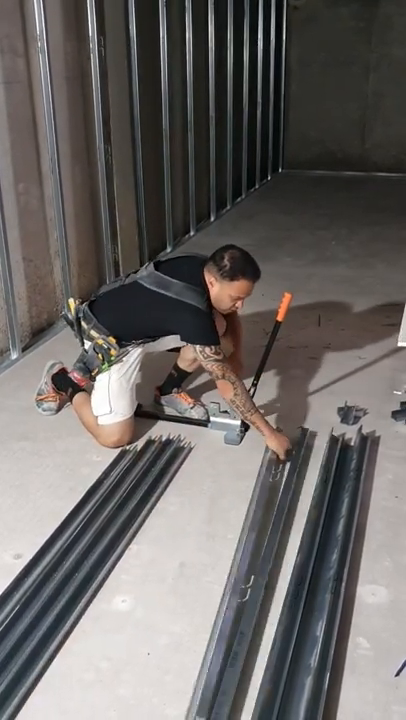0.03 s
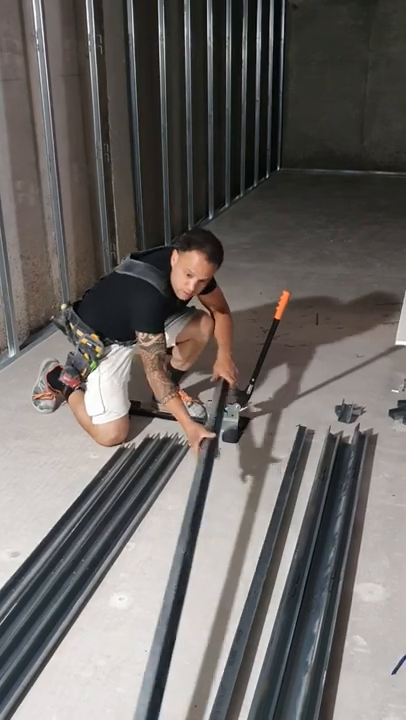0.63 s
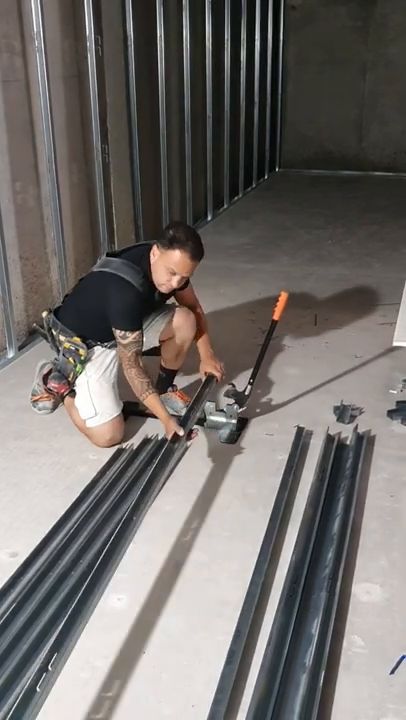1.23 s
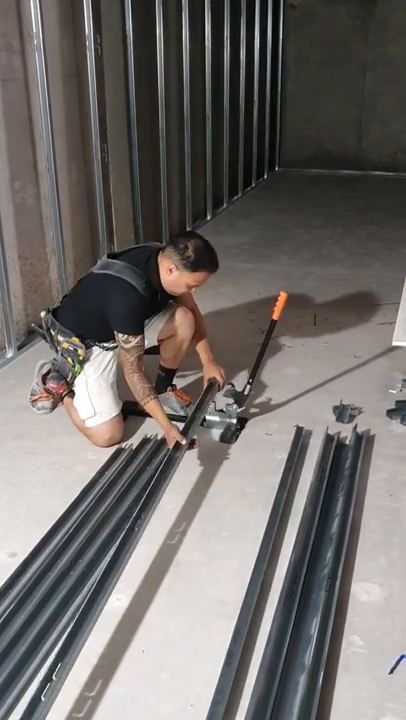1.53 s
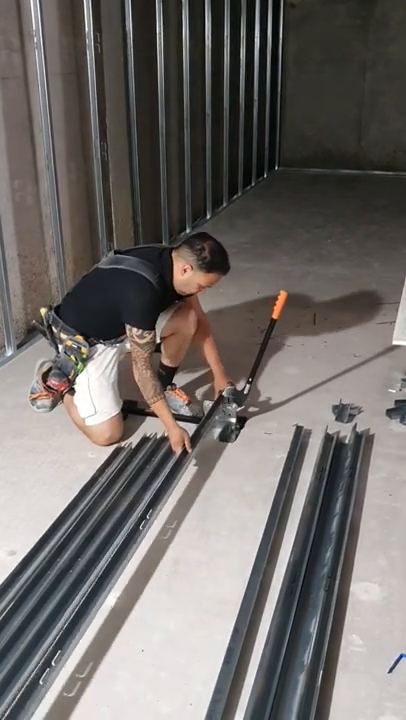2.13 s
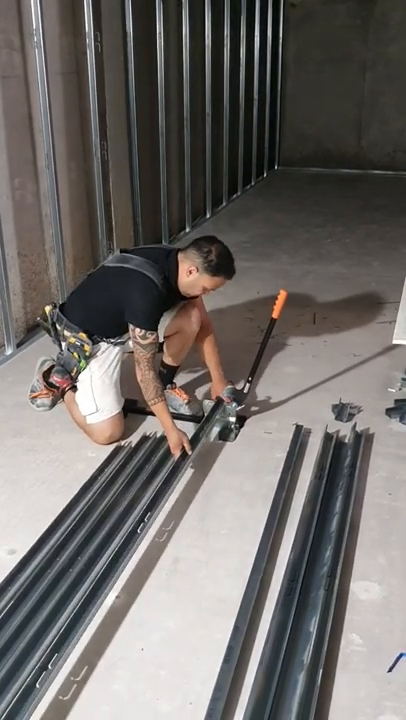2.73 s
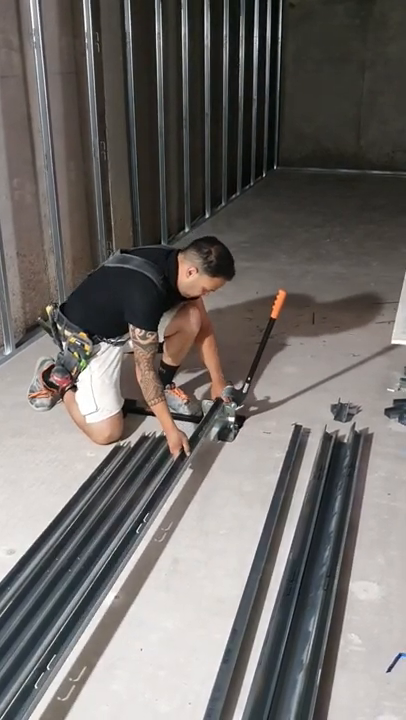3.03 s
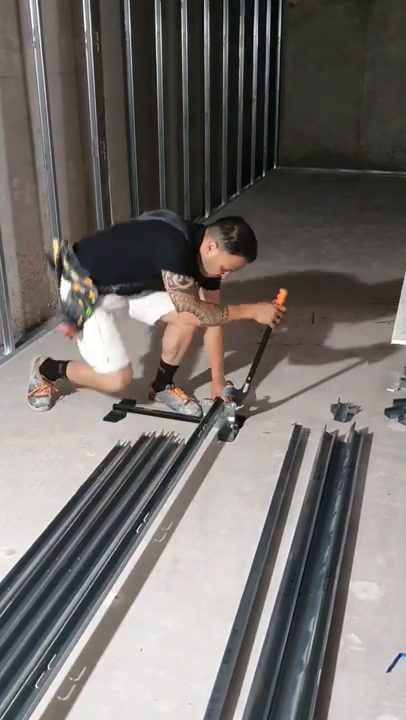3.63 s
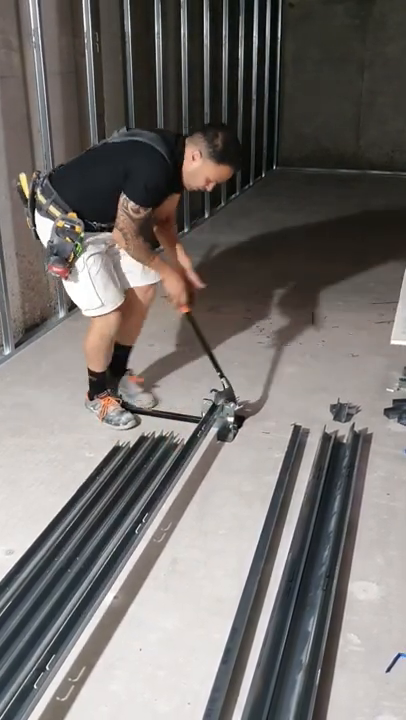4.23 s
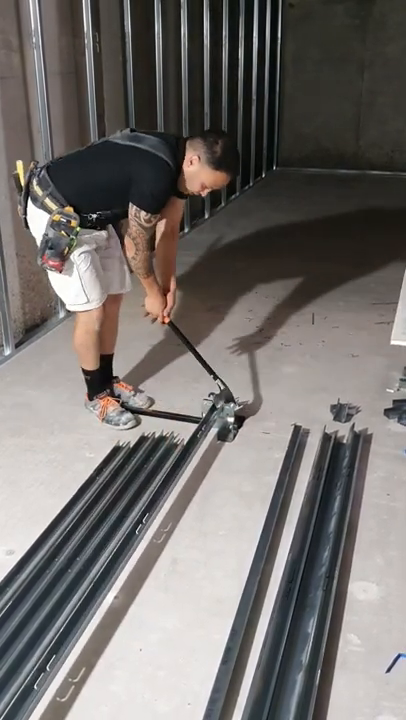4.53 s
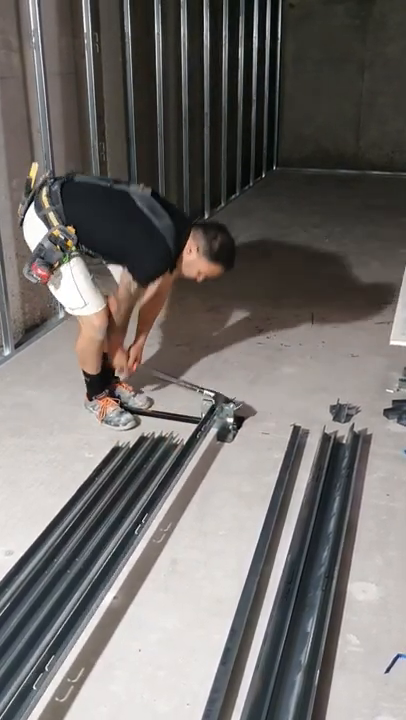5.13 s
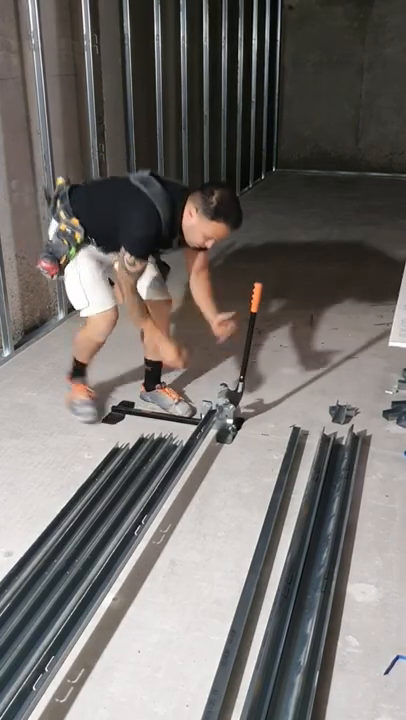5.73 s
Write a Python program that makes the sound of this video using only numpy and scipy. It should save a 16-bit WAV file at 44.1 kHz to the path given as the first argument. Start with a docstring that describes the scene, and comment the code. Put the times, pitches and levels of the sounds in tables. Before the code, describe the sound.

A long, thin steel profile is dragged off a pile with sharp, ringing knocks and scrapes, then clatters again as it slides into a lever cutter. After some quiet shoe scuffs come thumps and a loud clank. The blade shears the steel in a quick cluster of snaps and squeals briefly on its return. The bare concrete room echoes, and the sound is louder and harder on the right.

```python
"""In a bare concrete room, a long thin steel profile is dragged off a pile and sheared in a lever cutter.
Every knock sets the loose metal chattering and ringing. Sliding steel catches and slips, shoes scuff
and stamp, and the blade rubs, snaps the steel and squeals. A low hum swells and fades.
The right microphone port (its opening) resonates near 2 kHz, so that side is louder and harder."""
import sys
import numpy as np
from scipy import signal
from scipy.fft import irfft
from scipy.io import wavfile
from scipy.ndimage import uniform_filter1d, minimum_filter1d

SR = 44100
rng = np.random.default_rng(int(sys.argv[2]) if len(sys.argv) > 2 else 0)


def log_audio(samples):
    """Write samples as a 16-bit WAV file to the path given in sys.argv[1]."""
    # one column per channel
    frames = np.atleast_2d(samples).T
    # limit to full scale, then quantise
    limited = np.clip(frames, -1, 1)
    pcm = np.round(limited * 32767).astype(np.int16)
    wavfile.write(sys.argv[1], SR, pcm)


N = 264159
HZ = np.fft.rfftfreq(2048, 1 / SR)  # the frequencies at which filter gains are set


def amp(db):
    """Turns decibels into a gain."""
    return 10 ** (np.asarray(db) / 20)


def unit(x):
    """Scales a sound to an energy of one."""
    return x / np.sqrt(np.sum(x ** 2, axis=-1, keepdims=True) + 1e-20)


def read(points, hz):
    """Reads between the rows of a table, on a log-frequency axis."""
    f, value = np.transpose(points)
    return np.interp(np.log(hz + 1), np.log(f), value)


def around(hz, note_hz, octaves=0.15):
    """A bell curve of height one around a note."""
    return np.exp(-.5 * (np.log2((hz + 1) / note_hz) / octaves) ** 2)


def add(mix, s, sound):
    """Adds a sound to the mix at s seconds."""
    part = mix[..., max(round(s * SR), 0):][..., :sound.shape[-1]]
    part += sound[..., :part.shape[-1]]


def tone_filter(db):
    """The quickest impulse response that has these gains at the frequencies HZ."""
    log_gain = np.log(amp(np.r_[db, db[-2:0:-1]]))
    spectrum = np.exp(np.conj(signal.hilbert(log_gain)))
    return irfft(spectrum[:len(HZ)])


def contacts(samples, per_s, spread_db):
    """A random train of tiny taps of uneven size."""
    chance, size, sign = rng.random((3, samples))
    return (chance < per_s / SR) * amp(spread_db * size) * np.sign(sign - .5)


def steel(force, treble_db, bass_db, extra_db=0, treble_hz=3400, bass_hz=1100):
    """Thin steel turns a force into sound: hard contacts are brighter, heavy ones fuller."""
    # the tone of thin steel: f/Hz, level/dB
    spectrum = [(60, -36), (170, -27), (350, -18.5), (520, -15), (750, -3.5), (1100, 1.5), (1450, -2.5),
                (1950, 5.5), (2600, -3), (3600, -9), (5000, -10.5), (7000, -13.5), (9500, -24),
                (12500, -23.5)]
    plain = read(spectrum, HZ)
    treble = treble_db / (1 + (treble_hz / (HZ + 1)) ** 4)
    bass = bass_db / (1 + (HZ / bass_hz) ** 4)
    response = tone_filter(plain + treble + bass + extra_db)
    return signal.fftconvolve(force, response) / np.linalg.norm(tone_filter(plain))


def knock(s, db, treble_db, bass_db, decay_s, note_hz, note_db, impact_db=5.5, chatter_db=-0.5):
    """A blunt hit, then the loose steel chatters. Gives (start time, close-sound gain in dB, sound)."""
    t = np.arange(SR // 4) / SR
    share = 1 - np.exp(-decay_s / 0.0079)  # longer chatter takes more of the energy
    taps = contacts(len(t), per_s=1200, spread_db=12.5)
    chatter = unit(taps * np.exp(-t / decay_s) * (1 - np.exp(-t / 0.00066)))
    impact = np.exp(-2 * np.pi * 2600 * t)  # dull above 2600 Hz
    force = np.sqrt(share) * chatter + np.sqrt(1 - share) * impact / impact.sum()
    # the hit faces the microphone, while chatter spreads along the profile
    close_db = impact_db + (chatter_db - impact_db) * share
    return s, close_db, amp(db) * steel(force, treble_db, bass_db, note_db * around(HZ, note_hz))


def ringing(hits, modes, level_db, swell_s=0.02):
    """Each hit leaves the steel's own notes (modes) ringing, coloured by that hit's tone."""
    out = np.zeros((2, N))
    s, db, treble_db, bass_db, _, note_hz, note_db = np.transpose(hits)
    starts = np.round(s * SR).astype(int)
    swell = np.exp(-1 / (swell_s * SR))  # the ring takes a moment to fill the room
    for hz, mode_db, fade_s in modes:
        colour_db = treble_db * min(hz / 7000, 1) + bass_db * (hz < 1100) + note_db * around(hz, note_hz)
        kicks = np.zeros(N, complex)
        kicks[starts] = amp(db + colour_db) * np.exp(2j * np.pi * rng.random(len(starts)))
        fade = amp(-60 / fade_s / SR)
        turn = np.exp(2j * np.pi * hz / SR)
        feedback = np.poly([fade * turn, swell * turn])
        left = signal.lfilter([1 - swell], feedback, kicks) * 2 * np.sqrt(1 - fade)
        right = left * np.exp(2j * np.pi * rng.random())
        out += amp(mode_db + level_db) * np.array([left.real, right.real])
    return out


def profile_knocks():
    """The profile hits the pile, floor or cutter; where it is struck decides which note stands out."""
    # knocks: t/s, level/dB, treble/dB, bass/dB, chatter decay/s, note/Hz, note boost/dB
    hits = [ (0.001, 4.5, 6, 7.5, 0.013, 970, 0), (0.038, 13, 8.5, 4, 0.018, 568, 10.5),
            (0.105, 5, 8.5, 7, .005, 775, 12.5), (0.121, 11, 2.5, -11, 0.006, 1850, -1.5),
            (0.418, 7.5, -1, -8.5, 0.02, 3490, 6.5), (1.426, 10, -2.5, -1, 0.024, 820, -1),
            (1.438, 9.5, -1.5, 4.5, 0.063, 389, 8), (1.857, -2.5, -2, -13, 0.015, 12500, 5),
            (1.878, 10, -1.5, -3.5, 0.0092, 863, 14), (2.050, 9, -24, -0.5, .004, 1040, 6.5),
            (2.177, 7.5, -5.5, -8, 0.024, 11900, 5), (2.347, 5, -4, 2, 0.011, 12100, 6.5),
            (2.62, -11, -6.5, 17.5, 0.016, 700, -18), (2.969, -27.5, -3.5, -14, 0.0044, 2200, 4.5),
            (3.185, -6.5, 1, -10.5, 0.012, 3520, 5), (3.607, -23, 6.5, 12.5, 0.028, 12300, 5),
            (3.844, -16, -9.5, 8.5, 0.0094, 1110, -3), (3.893, -20.5, -7, 20, 0.0088, 1013, 8.5),
            (4.007, 0.5, -15.5, 10, 0.01, 1340, -0.5), (4.326, 12.5, -2.5, -1.5, 0.0038, 1020, 1),
            (4.725, 3, 15.5, 1.5, .005, 12400, 12)]
    # the notes of the whole profile: f/Hz, relative level/dB, time to fade by 60 dB/s
    modes = [(172, -47, 1.6), (393, -32, 1.7), (604, -27, 1.2), (730, -25, 1.3), (816, -24, 1.2),
             (961, -27, 1.2), (1135, -28, 1.3), (1248, -30, 1.1), (1500, -29, 1.1), (1825, -27, 1.1),
             (1888, -26, 1.2), (2195, -29, .9), (2993, -32, 1.1), (3310, -37, 1.25), (3553, -32, 1),
             (3693, -33, .9), (4986, -36, .9)]
    return [knock(*hit) for hit in hits], ringing(hits, modes, level_db=2)


def hum_and_air(hum_hz=48.2, rumble_db=-16, air_db=-81):
    """A low hum with a little rumble swells and fades, over very quiet air."""
    # the rise and fall of the hum: t/s, level/dB
    swells = [(0.0, -68), (0.32, -85.5), (0.8, -70), (1.25, -77.5), (1.8, -58), (2.17, -70), (2.22, -63),
              (2.47, -92), (2.85, -59.5), (4.12, -47), (4.59, -60.5), (4.84, -83), (4.87, -67.5),
              (5.17, -89), (5.91, -78), (5.99, -84.5)]
    # the tone of the air: f/Hz, relative level/dB
    air_spectrum = [(30, -1), (100, -0.5), (400, -7), (2000, -11.5), (4000, -32.5), (7000, -33.5),
                    (10000, -51.5)]
    t = np.arange(N) / SR
    low_band = signal.butter(2, [45, 90], "band", fs=SR, output="sos")
    rumble = signal.sosfilt(low_band, rng.standard_normal(N))
    tone = np.sqrt(2) * np.sin(2 * np.pi * hum_hz * t)
    level = amp(np.interp(t, *np.transpose(swells)))
    hum = level * (tone + amp(rumble_db) * rumble / rumble.std())
    air_filter = unit(tone_filter(read(air_spectrum, HZ)))
    air = signal.oaconvolve(rng.standard_normal((2, N)), air_filter[None], axes=1)[:, :N]
    return hum + amp(air_db) * air


def scrape(length_s, db, treble_db, bass_db=0, slips_per_s=1500, uneven_db=12.5):
    """An edge catches and slips many times during one stroke that swells and fades."""
    t = np.arange(SR // 2) / SR
    stroke = np.sin(np.pi * np.minimum(t / length_s, 1))
    force = unit(contacts(len(t), slips_per_s, uneven_db) * stroke)
    return amp(db) * steel(force, treble_db, bass_db)


def profile_slides():
    """The profile slides over the pile and through the cutter; pressed harder, it sounds duller."""
    # slides: t/s, length/s, level/dB
    slides = [(0.043, 0.23, 7.5), (0.253, 0.32, 0), (0.662, 0.12, -18.5), (0.95, 0.2, -35),
              (1.599, 0.27, 2), (1.98, 0.3, 5.5), (2.163, .13, -0.5), (2.619, 0.2, -31),
              (2.927, 0.058, -30), (3.001, 0.45, -21.5), (3.88, 0.32, -7), (4.455, 0.41, -8.5),
              (5.677, 0.36, -44.5)]
    return [(s, scrape(length, db, treble_db=-6 - 0.375 * db)) for s, length, db in slides]


def floor_thumps(decay_s=0.0074, soft_hz=1600, close_db=7):
    """Shoes and the cutter's base give the concrete short, soft pushes."""
    # thumps: t/s, level/dB
    thumps = [(2.349, -15.5), (3.997, -3.5), (4.308, -4), (5.636, -34), (5.932, -33.5)]
    # the tone of a thump on concrete: f/Hz, relative level/dB
    spectrum = [(30, -35), (80, -13.5), (140, -17.5), (260, -7), (420, -3), (700, -8), (1500, -14.5)]
    t = np.arange(SR // 10) / SR
    floor = tone_filter(read(spectrum, HZ))
    events = []
    for s, db in thumps:
        burst = rng.standard_normal(len(t)) * np.exp(-t / decay_s)
        push = signal.lfilter(*signal.butter(2, soft_hz, fs=SR), burst)
        events.append((s, close_db, amp(db) * unit(signal.fftconvolve(push, floor))))
    return events


def shoe_scuffs():
    """Shoes catch and slip on the concrete."""
    # scuffs: t/s, length/s, level/dB
    scuffs = [(2.64, .2, -28.5), (3.17, 0.38, -22.5), (3.619, .35, -22), (4.135, 0.069, -20)]
    return [(s, scrape(length, db, treble_db=9.5, bass_db=15.5)) for s, length, db in scuffs]


def blade_strokes():
    """The blade shears down through the steel and rubs back up."""
    # strokes: t/s, length/s, level/dB, treble/dB
    strokes = [(4.736, 0.087, 8, 10.5), (4.911, 0.14, 3, 5), (5.05, 0.2, 4, -1), (5.222, 0.2, -4.5, 3.5)]
    return [(s, scrape(length, db, treble_db, bass_db=-10, slips_per_s=800, uneven_db=11))
            for s, length, db, treble_db in strokes]


def steel_snaps(bass_db=-6.5, chatter_s=0.0042, note_db=6):
    """The steel snaps under the blade and springs free, and the short cut piece rings."""
    # snaps: t/s, level/dB, treble/dB, note/Hz
    snaps = [(4.865, 3, -4.5, 2080), (4.890, 1, 1, 2050), (4.917, 10.5, 1.5, 980), (4.927, 5.5, 1, 4090),
             (4.947, 3.5, 1.5, 4960), (4.984, 2, -20, 1990), (5.02, 2, -6.5, 3670), (5.224, -5, -17, 1870)]
    # the notes of the cut piece: f/Hz, relative level/dB, time to fade by 60 dB/s
    modes = [(1135, -25, 1.1), (1319, -28, 1.1), (1888, -22, 1.2), (1955, -23, 1.1), (2396, -29, 1.1),
             (2977, -30, 1), (3650, -24, .9), (4086, -26, .9), (4856, -26, .8), (4972, -24, .8),
             (4988, -20, .85), (5953, -31, .85), (6285, -29, .85), (7300, -31, .8)]
    hits = [(s, db, treble_db, bass_db, chatter_s, hz, note_db) for s, db, treble_db, hz in snaps]
    return [knock(*hit, impact_db=9.5) for hit in hits], ringing(hits, modes, level_db=3.5)


def blade_squeal(start_s=5.11, length_s=0.15, db=-6, note_hz=5040, width_hz=130):
    """The returning blade makes the cut edge squeal briefly."""
    rub = scrape(length_s, db=0, treble_db=0)
    squeal = signal.lfilter(*signal.iirpeak(note_hz, note_hz / width_hz, fs=SR), rub)
    return start_s, amp(db) * unit(squeal)


def close_sound(x, straight_db=-9, echo_db=-6, decay_s=0.0098):
    """Sound reaches each port straight, then as quick echoes off the floor and the wall studs."""
    t = np.arange(SR // 12) / SR
    echoes = np.array([contacts(len(t), per_s=1000, spread_db=20) for _ in range(2)])
    response = amp(echo_db) * unit(echoes * np.exp(-t / decay_s))
    right_delay = rng.integers(12)  # samples
    response[0, 0] += amp(straight_db)
    response[1, right_delay] += amp(straight_db)
    return signal.fftconvolve(x[None], response, axes=1)


def room(x, tail_db=-2, build_s=0.0042):
    """Bare concrete gives a long, dense echo whose treble dies first."""
    # how long the room rings: f/Hz, time to fade by 60 dB/s
    fade_times = [(100, 1.8), (400, 1.5), (1000, 1.155), (2000, 0.73), (4000, 0.69), (7000, 0.6),
                  (12500, 0.35)]
    t = np.arange(3 * SR // 2) / SR
    hz, when, bands = signal.stft(rng.standard_normal((2, len(t))), SR, nperseg=256)
    fade = amp(-60 * when / read(fade_times, hz)[:, None])
    tail = signal.istft(bands * fade, SR, nperseg=256)[1][:, :len(t)]
    response = amp(tail_db) * unit(tail * (1 - np.exp(-t / build_s)))
    return signal.fftconvolve(x[None], response, axes=1)[:, :N]


def scene(spot_count=5):
    """The sounds are dealt out in turn to several spots, each with its own path through the room."""
    thumps = floor_thumps()
    knocks, profile_ring = profile_knocks()
    snaps, cut_piece_ring = steel_snaps()
    rubbing = profile_slides() + shoe_scuffs() + blade_strokes() + [blade_squeal()]
    rubs = [(s, 0, sound) for s, sound in rubbing]  # close-sound gain of 0 dB
    spots, close = np.zeros((spot_count, N)), np.zeros((2, N))
    for k, (s, close_db, sound) in enumerate(knocks + snaps + rubs + thumps):
        add(close, s, amp(close_db) * close_sound(sound))
        add(spots[k % spot_count], s, sound)
    return close + sum(room(spot) for spot in spots) + profile_ring + cut_piece_ring + hum_and_air()


def record(dry, mono_hz=720, ceiling=0.79, top_hz=14600):
    """Two close ports share the bass and the right one resonates; peaks and the top treble are cut."""
    # the resonance of the right port: f/Hz, gain/dB
    right_port = [(450, 1.5), (800, 0.5), (1100, 4), (1400, 6), (1750, 13), (2050, 14), (2350, 11.5),
                  (2800, 4.5), (3550, 10), (4400, 3.5), (6800, 11), (9000, 2), (12400, 8.5), (14500, -6)]
    mid, side = (dry[0] + dry[1]) / 2, (dry[0] - dry[1]) / 2
    side = signal.lfilter(*signal.butter(1, mono_hz, "high", fs=SR), side)
    right = signal.oaconvolve(mid - side, tone_filter(read(right_port, HZ)))[:N]
    both = np.array([mid + side, right])
    allowed = np.minimum(1, ceiling / (abs(both).max(0) + 1e-9))
    limiter_gain = uniform_filter1d(minimum_filter1d(allowed, size=221), size=221)  # smoothed over 5 ms
    low_pass = signal.firwin(101, top_hz, window=("kaiser", 9), fs=SR)
    return signal.oaconvolve(both * limiter_gain, low_pass[None], "same")


dry = scene()
out = record(dry)
log_audio(out)
```